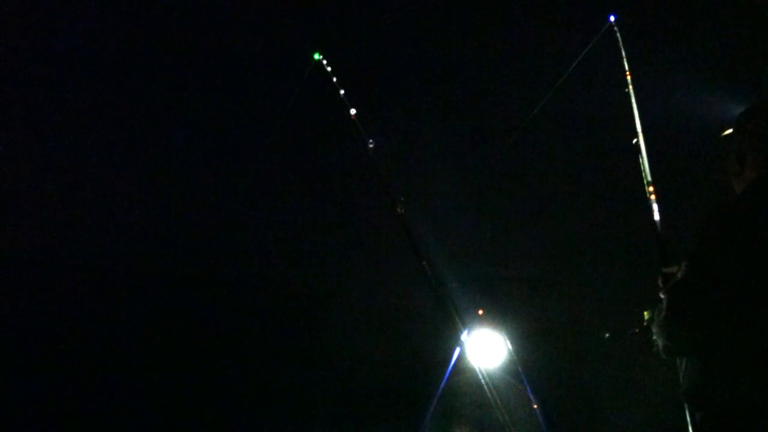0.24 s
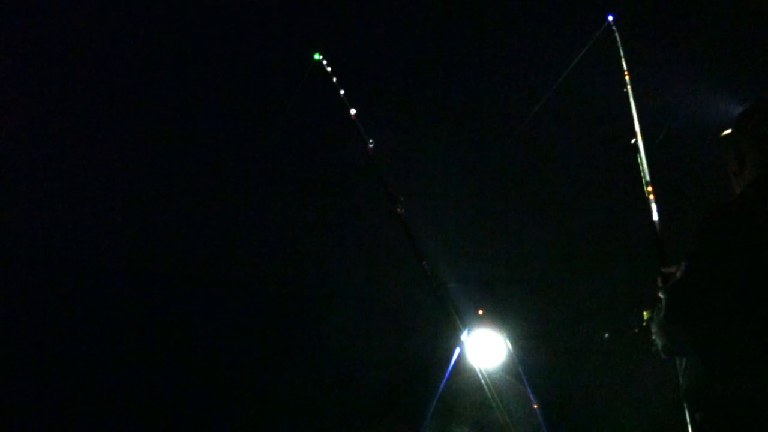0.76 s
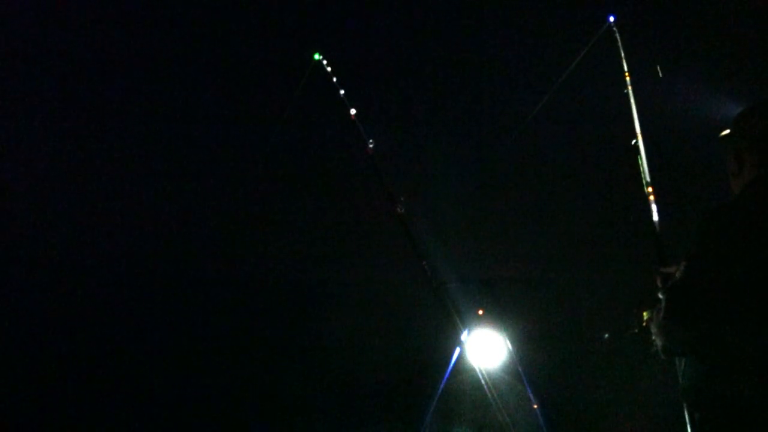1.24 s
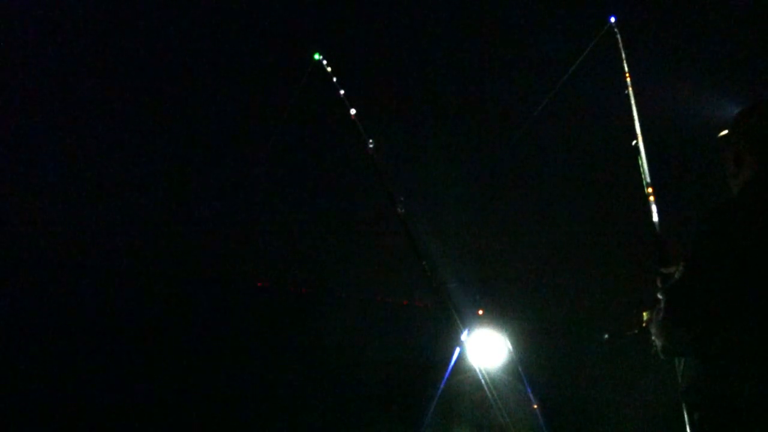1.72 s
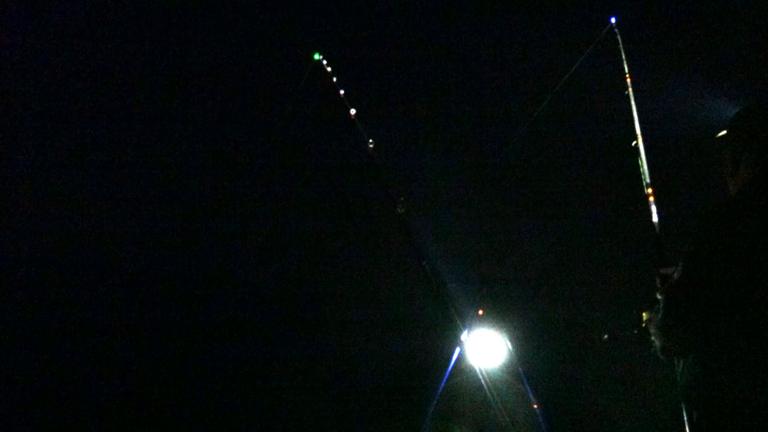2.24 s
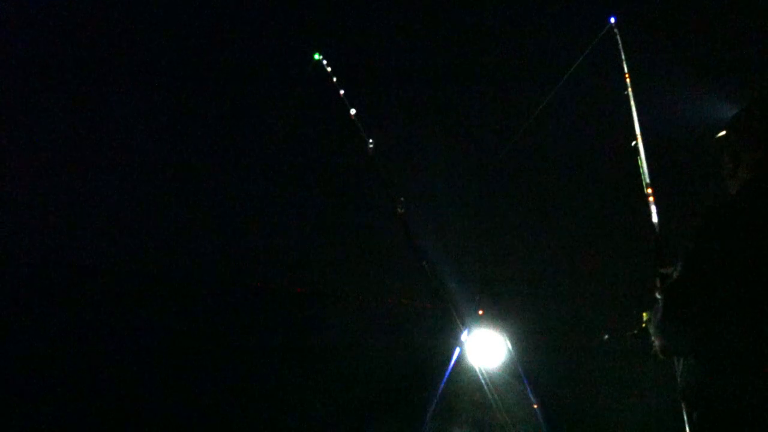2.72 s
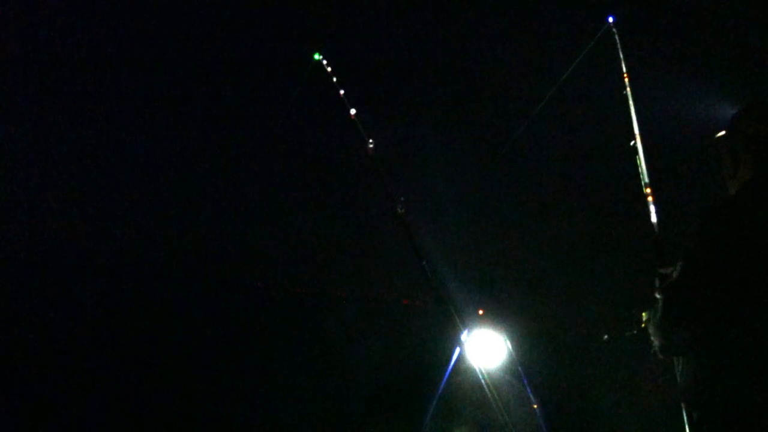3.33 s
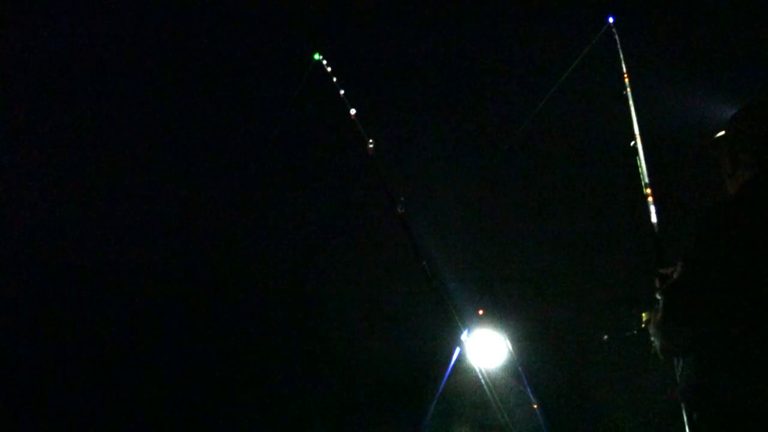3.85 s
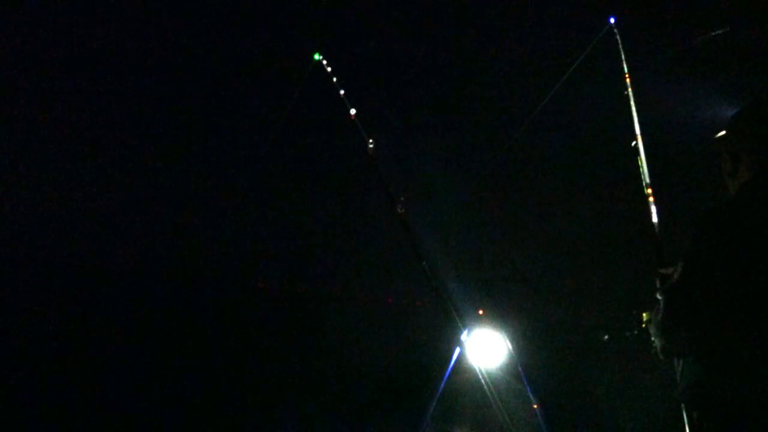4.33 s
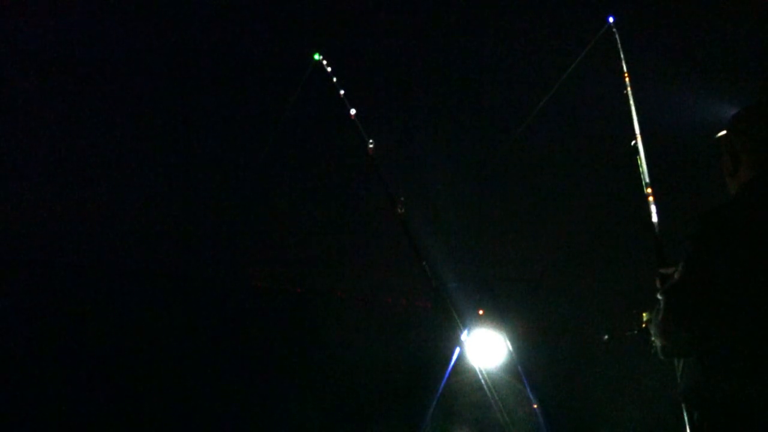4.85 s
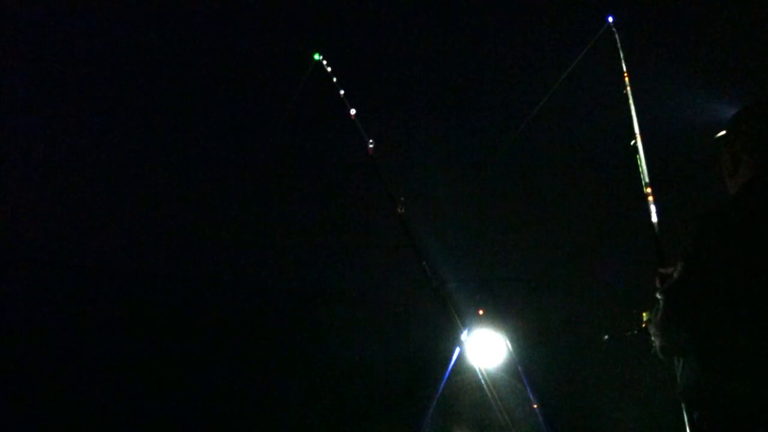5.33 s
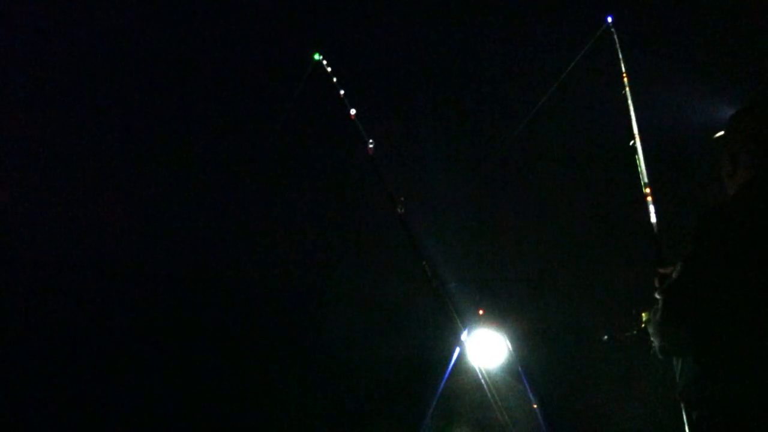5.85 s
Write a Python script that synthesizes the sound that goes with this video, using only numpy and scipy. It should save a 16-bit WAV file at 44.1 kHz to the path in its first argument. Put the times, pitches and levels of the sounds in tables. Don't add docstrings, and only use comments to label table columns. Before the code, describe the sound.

A wave foams up a pebble beach and drains away, stones rattling in the backwash, before a second wave plunges with a thump and spray.

```python
import sys
import numpy as np
from scipy import signal
from scipy.fft import rfft, irfft, next_fast_len
from scipy.io import wavfile
from scipy.ndimage import uniform_filter1d, map_coordinates

SR = 44100
rng = np.random.default_rng(int(sys.argv[2]) if len(sys.argv) > 2 else 0)


def volts_from_decibels(level):
    exponent = np.asarray(level, float) / 20
    return 10 ** exponent


def file_out(sig):
    cols = np.atleast_2d(sig).T
    lim = np.clip(cols, -1, 1)
    pcm = np.round(lim * 32767).astype(np.int16)
    wavfile.write(sys.argv[1], SR, pcm)


N = 268111

# pitch_hz, level_db
INPUT_HISS = [(10, 24), (43, 19), (90, 14), (170, 9), (350, 5), (700, 3), (3000, 1), (9000, 0), (13800, -1),
              (14100, 1), (14400, -1), (15100, -2), (15250, -8), (15600, -7)]
# start_s, level_db
BUZZ_LEVEL = [
    (0, -87),
    (2.2, -87),
    (2.7, -98),
    (3.6, -98),
    (4.1, -88),
    (4.8, -88),
    (5.05, -98),
    (5.3, -88),
    (6.08, -88),
]
# pitch_hz, level_db
MIC_NOISE = [(10, -1), (30, -3), (60, -6), (150, -22), (400, -30), (6000, -28), (13700, -30), (14100, -27),
             (14500, -31), (15500, -41)]

# start_s, level_db, big_bubbles (share 0-1)
FOAM_FLOW = [(0, -33, 0.21), (.18, -32, 0.17), (.41, -31, 0.06), (.62, -31, .04), (.87, -32.5, 0),
             (1.3, -38.5, 0.03), (1.63, -43, 0.16), (1.95, -47.5, 0.26), (2.4, -53, 0.13),
             (2.66, -57.5, 0.06), (2.88, -53, 0.12), (3.18, -52.5, 0.38), (3.4, -49.5, 0.22),
             (4.08, -47.5, 0.64), (4.23, -39, 0.98), (4.4, -30.5, 0.65), (4.56, -31, 0.94),
             (4.72, -33, 0.69), (4.98, -39.5, 0.58), (5.55, -48, 0.45), (6.08, -55, 0.48)]
# start_s, flow_db, extra_spray_db, rolling_stones (share 0-1)
WATER_FLOW = [(0, -41, 0, 0.24), (.41, -36, -0.5, 0.21), (.9, -36, 0, 0.18), (1.45, -42, 3.5, 0.25),
              (2.1, -50, -1, 0.08), (2.68, -55.5, -0.5, 0.17), (3.05, -52.5, 5, .33),
              (3.19, -55, 2.5, 0.31), (3.3, -50.5, 2.5, 0.33), (4.0, -51, 1.5, 0.23),
              (4.17, -52, 5.5, 0.12), (4.2, -46, 10, 0.28), (4.24, -44.5, 9, 0.2), (4.28, -39.5, 11, 0.15),
              (4.34, -38, 9.5, 0.2), (4.44, -41.5, 10.5, 0.08), (4.6, -40.5, 7.5, 0.12),
              (4.98, -53.5, 4.5, 0.1), (5.5, -56, 0.5, 0.12), (5.7, -64.5, -1, 0.15), (6.08, -67, -3, 0.17)]
# start_s, peak_db, fade_s (to 1/e)
WATER_SLAPS = [(.03, -51.5, 0.15), (1.2, -59, 0.092), (1.44, -52, 0.089), (1.58, -55, 0.1),
               (1.71, -55, 0.042), (2.2, -61, 0.085), (2.76, -63, 0.95), (3.13, -48, 0.027),
               (3.3, -77, 0.33), (3.55, -61.5, 0.54), (3.8, -58.5, 0.3), (4.22, -42.5, 0.12),
               (4.275, -40, 0.069), (4.48, -43, 0.2), (4.78, -49.5, 0.25), (4.95, -57, 0.5),
               (5.2, -58, 0.43), (5.55, -58, 0.12)]
# start_s, peak_db, fade_s (to 1/e)
FOAM_BURSTS = [(0.062, -20, 0.03), (0.19, -37, 0.028), (0.256, -18, 0.048), (0.308, -18, 0.045),
               (0.366, -13, 0.024), (0.439, -30, 0.03), (0.485, -11.5, 0.015), (0.529, -18.5, 0.058),
               (0.555, -18, 0.035), (0.625, -17, 0.03), (0.685, -32, 0.027), (0.728, -17, 0.03),
               (0.762, -26, 0.03), (0.85, -15, 0.023), (0.916, -20, 0.03), (1.019, -30, 0.03),
               (1.139, -21.5, 0.03), (1.539, -30, 0.03), (1.749, -31, 0.03), (1.956, -36, 0.025),
               (1.997, -51, 0.026), (2.05, -48, 0.03), (2.114, -41, 0.03), (2.239, -32, 0.021),
               (2.289, -36, 0.03), (2.349, -46, 0.03), (2.484, -36, 0.03), (2.545, -35.5, 0.026),
               (2.688, -38, 0.024), (2.791, -51, 0.03), (2.854, -40, 0.03), (2.978, -34, 0.022),
               (3.044, -43, 0.03), (3.15, -40, 0.03), (3.215, -36, 0.036), (3.255, -35, 0.042),
               (3.359, -50, 0.03), (3.599, -37, 0.03), (3.814, -38, 0.03), (3.889, -41, 0.03),
               (3.939, -41, 0.023), (3.999, -35, 0.03), (4.057, -32, 0.053), (4.114, -27.5, 0.03),
               (4.191, -24, 0.026), (4.227, -20.5, 0.025), (4.261, -33, 0.026), (4.304, -17, 0.03),
               (4.379, -16, 0.039), (4.405, -14.5, 0.036), (4.443, -29, 0.027), (4.506, -18, 0.042),
               (4.539, -14, 0.03), (4.599, -17, 0.074), (4.701, -24, 0.033), (4.744, -21, 0.021),
               (4.836, -39, 0.03), (4.979, -44, 0.03), (5.063, -28, 0.03), (5.159, -28, 0.023)]
# start_s, fine_bubbles (share 0-1)
FOAM_THINNING = [(0, 0), (.3, 0.44), (.8, 0.15), (1.3, 1), (1.9, 0.2), (2.5, 0.76), (2.9, 0.1), (4.0, 0.03),
                 (4.4, 0.3), (4.7, 0), (6.08, 0.15)]

# pitch_hz, level_db
THUMP_SPECTRUM = [(60, -60), (100, -33), (150, -7), (250, 5), (330, 4.5), (500, -6.5), (900, -61)]
BOOM_SPECTRUM = [(30, -50), (50, -32), (70, -17), (100, -3.5), (200, 2), (320, -2.5), (600, -68)]
SMALL_FOAM_SPECTRUM = [(150, -35), (300, -23.5), (590, -1), (920, 2), (1150, 3), (1400, -3), (1700, -11),
                       (2500, -14), (4000, -78)]
BIG_FOAM_SPECTRUM = [(120, -71), (250, -13), (400, -4), (620, -2), (1130, -7), (1500, -15.5), (2200, -20.5),
                     (4000, -69)]
FINE_FOAM_SPECTRUM = [(250, -48), (600, -15), (950, -4), (1230, -1), (1450, -5.5), (1750, -15.5),
                      (2500, -19), (4000, -70)]
WASH_SPECTRUM = [(700, -52), (1300, 5.5), (1700, 3.5), (2100, 0.5), (2800, -4.5), (3500, -18),
                 (4500, -14.5), (6000, -21.5), (9000, -81)]
FIZZ_SPECTRUM = [(900, -57), (1500, -0.5), (2000, -7.5), (2600, 0), (3500, -2), (4300, -10), (4800, -13),
                 (6000, -37), (9000, -75)]
CLATTER_SPECTRUM = [(800, -35), (1500, -0.5), (2200, 10.5), (2800, -5), (3500, 0.5), (4200, -10),
                    (4800, -9), (6000, -41), (9000, -72)]
SPRAY_SPECTRUM = [(2500, -36), (4000, -4.5), (5000, -0.5), (6200, -2), (7300, -11.5), (9500, -20.5),
                  (12000, -27.5), (15500, -38)]
MIST_SPECTRUM = [(2500, -18), (4000, -1), (5000, -4), (6200, -8), (7900, -8.5), (9500, -15), (11800, -22),
                 (15500, -36)]
TINKLE_SPECTRUM = [(2500, -14), (4200, -2), (4800, -14), (5500, -3), (6300, -11), (7500, -8), (9500, -21.5),
                   (12000, -30), (15500, -46)]

# start_s, peak_db
GRIT_SNAPS = [(0.016, -47), (0.0323, -46), (0.078, -51), (0.206, -48), (0.1052, -53), (0.1376, -47),
              (0.1585, -48), (0.1955, -47), (0.2718, -55), (0.2887, -49), (0.3641, -54), (0.4793, -45),
              (0.5162, -54), (0.6484, -50), (0.6669, -52), (0.9288, -48), (1.0575, -55), (1.1692, -53),
              (1.2461, -52), (1.486, -52), (1.5554, -58), (1.7664, -58), (1.8766, -53), (1.9155, -52),
              (1.945, -45), (2.0787, -56), (2.1161, -47), (2.1954, -55), (2.3291, -57), (2.3635, -57),
              (2.4309, -64), (2.5296, -61), (2.7467, -57), (2.9013, -57), (2.9472, -61), (2.9776, -58),
              (3.0939, -54), (3.1797, -62), (3.258, -59), (3.272, -56), (3.3114, -50), (3.3528, -55),
              (3.4481, -60), (3.4655, -47), (3.5209, -57), (3.6511, -58), (3.7718, -59), (3.9634, -53),
              (4.1989, -54), (4.295, -46), (4.756, -45), (4.863, -47), (5.2844, -50), (5.5119, -57),
              (5.8591, -58), (5.915, -54), (5.9843, -70), (6.0137, -55)]
# start_s, peak_db, pitch_hz
STONE_TICKS = [(0.1584, -50, 4320), (0.1955, -49, 5650), (0.3676, -56, 4390), (0.5212, -45, 4600),
               (0.5417, -41, 4400), (0.6355, -48, 4300), (0.8554, -46, 4460), (1.0584, -45, 4550),
               (1.3374, -40, 4960), (1.4197, -49, 4380), (1.4474, -39, 4430), (1.488, -48, 4300),
               (1.6003, -41, 5080), (1.6164, -42, 4810), (1.7614, -41, 4600), (1.7828, -43, 5400),
               (1.9924, -45, 5570), (2.0797, -59, 4650), (2.1334, -46, 4370), (2.2174, -43, 4730),
               (2.5296, -44, 5450), (2.7466, -44, 4300), (2.9272, -55, 5050), (4.2244, -43, 4300),
               (4.2433, -42, 5080), (4.2744, -38, 4500), (5.1682, -50, 4580), (5.8591, -54, 4370),
               (5.9274, -52, 5430), (5.9843, -59, 5330)]
# start_s, peak_db, pitch_hz, chip_db (bright chip over the ring)
PEBBLE_KNOCKS = [(1.9437, -38, 2870, -8), (2.162, -40, 2800, -6), (2.465, -43, 2700, -6),
                 (2.695, -43, 4400, -9), (2.7138, -44, 3260, -12), (2.751, -46, 2600, -18),
                 (2.798, -46, 3740, -7), (2.829, -44, 3400, -12), (2.8586, -42, 2570, -18),
                 (2.966, -45, 3240, -15), (2.9901, -40, 3320, -22), (3.0242, -37.5, 2720, -24),
                 (3.0765, -38.5, 2850, -23), (3.0939, -40, 3050, -9), (3.1167, -38.5, 3600, -10),
                 (3.137, -43, 3780, -18), (3.2594, -41, 3550, -17), (3.275, -33, 3300, -21),
                 (3.311, -41, 2830, -27), (3.3916, -40, 3100, -22), (3.462, -41, 3320, -18),
                 (3.5036, -41, 3440, -19), (3.5283, -38, 3450, -25), (3.6643, -39, 3400, -19),
                 (3.7505, -38.5, 2390, -24), (3.821, -40, 3400, -16), (3.8516, -41, 3180, -16),
                 (3.925, -40, 3870, -20), (4.011, -39, 3530, -19), (4.1954, -34, 4290, -11)]
# start_s, peak_db, pitch_hz
STONE_PATTER = [(2.0944, -38, 3000), (2.2907, -36, 4200), (2.4474, -52, 5250), (2.4854, -49, 3670),
                (2.609, -43, 4500), (2.66, -46, 4600), (2.669, -46, 4000), (2.688, -40, 2300),
                (2.995, -38, 3300), (3.012, -41, 2600), (3.124, -36, 2600), (3.19, -40, 3700),
                (3.234, -40, 2900), (3.887, -39, 2800), (2.5004, -52, 3420), (2.5835, -51, 3650),
                (2.7202, -42, 3420), (2.7701, -35, 3130), (2.8215, -42, 3800), (2.8824, -40, 3920),
                (2.9464, -47, 3000), (2.9582, -36, 3850), (2.9774, -42, 3290), (3.0454, -41, 3790),
                (3.0604, -38, 3910), (3.1424, -37, 3800), (3.1852, -36, 3450), (3.299, -45, 3440),
                (3.3473, -44, 3360), (3.3717, -34, 3530), (3.4004, -40, 3700), (3.556, -43, 3340),
                (3.5824, -36, 3030), (3.613, -41, 3380), (3.6534, -40, 3360), (3.7244, -48, 3760),
                (3.7693, -35, 3770), (3.8034, -38, 3340), (3.8884, -43, 3180), (3.9574, -49, 3480),
                (4.0404, -48, 3820), (4.0954, -46, 3090), (4.1144, -39, 3910)]
# start_s, peak_db, pitch_hz
FLUNG_STONES = [(4.1774, -34, 3660), (4.2264, -31, 3880), (4.2434, -34, 2730), (4.2737, -29, 2730),
                (4.2944, -28, 3040), (4.3804, -33, 2690), (4.5784, -36, 3390), (4.6254, -32, 2580),
                (4.7294, -36, 2820), (4.7554, -31, 2720), (4.8624, -34, 3680), (4.8903, -33, 3610),
                (4.9174, -43, 2790), (4.9494, -41, 2600), (5.0644, -44, 2680)]
# start_s, peak_db, pitch_hz
AIR_GULPS = [(1.2, -55.5, 189), (1.447, -52.5, 203), (1.48, -53.5, 157), (1.611, -45, 213),
             (1.46, -49, 440), (1.54, -56, 383), (1.66, -63, 332), (1.721, -65, 156), (1.8, -47, 323),
             (1.92, -58, 400), (2.02, -61, 355), (2.45, -63, 238), (2.78, -62, 332), (3.78, -58, 184),
             (2.215, -70, 112), (3.66, -64, 94), (3.687, -38, 945), (4.9, -31, 950), (4.3, -44, 216),
             (4.319, -47, 85.5), (4.392, -50.5, 67.6), (4.469, -59, 59.5)]
# start_s, peak_db, pitch_hz
BUBBLE_GURGLES = [(1.475, -33, 1250), (1.539, -30.5, 730), (1.561, -23, 1050), (1.657, -32, 1180),
                  (1.798, -33, 1180), (1.869, -31, 1170), (2.113, -35, 656), (2.719, -37, 760),
                  (2.929, -40, 640), (3.043, -32, 1040), (3.229, -40, 1120), (3.329, -36, 1390),
                  (3.419, -41, 1100), (3.528, -44, 1310), (3.599, -38, 1160), (3.749, -36, 1540),
                  (3.811, -36, 770), (3.898, -42, 446), (3.949, -30, 690), (3.979, -39, 840),
                  (4.019, -32, 600), (4.057, -29, 555), (4.129, -36, 714)]


def unit(x):
    return x / np.sqrt(np.mean(x ** 2) + 1e-20)


def curves(rows):
    s, *columns = np.transpose(rows)
    t = np.arange(N) / SR
    return [np.interp(t, s, column) for column in columns]


def wobble(rate):
    points = rng.standard_normal(N // 500)
    return map_coordinates(points, [np.arange(N) * np.clip(rate, 0, 80) / SR])


def coloured(x, spectrum):
    size = next_fast_len(N + 8192)
    hz, db = np.transpose(spectrum)
    log_hz = np.log(np.fft.rfftfreq(size, 1 / SR) + 1)
    gain = volts_from_decibels(np.interp(log_hz, np.log(hz + 1), db, left=-120))
    return unit(irfft(rfft(x, size) * gain, size)[:N])


def patchy(patchy_db):
    z = signal.stft(rng.standard_normal(N), nperseg=512)[2]
    field = uniform_filter1d(rng.standard_normal(z.shape), 5, 0)
    field = uniform_filter1d(field, 8, 1)
    return unit(signal.istft(z * volts_from_decibels(patchy_db * unit(field)), nperseg=512)[1][:N])


def pings(s, hz, gain, cycles, rise, size, sharp=2):
    k = np.arange(size)
    age = hz[:, None] * k / SR
    tone = np.sin(2 * np.pi * age * (1 + rise * age / cycles))
    wave = tone * np.exp(-age / cycles) * (1 - np.exp(-sharp * age))
    at = (s * SR).astype(int)[:, None] + k
    return np.bincount(at.ravel(), (gain[:, None] * wave).ravel(), N + size)[:N]


def swarm(count, hz, spread, range_db, cycles, rise, size):
    u, g = rng.random((count, 2)), rng.standard_normal(count)
    pitch = np.clip(hz * np.exp(spread * g), 50, 15000)
    rare = -np.log(u[:, 1] + .015)
    return unit(pings(u[:, 0] * N / SR, pitch, volts_from_decibels(range_db * rare), cycles, rise, size))


def blend(a, b, share):
    share = np.clip(share, 0, 1)
    return np.sqrt(1 - share) * a + np.sqrt(share) * b


def outbursts(rows, rise_s):
    t = np.arange(0, N + 64, 64) / SR
    s, db, fade_s = np.transpose(rows)[..., None]
    age = np.clip(t - s, 0, None)
    power = np.sum(volts_from_decibels(2 * db) * (1 - np.exp(-age / rise_s)) * np.exp(-2 * age / fade_s), axis=0)
    return np.interp(np.arange(N) / SR, t, power)


def circuit():
    t = np.arange(N) / SR
    buzz_hz, hiss_db = 470.6, -77.6
    buzz = unit(sum(volts_from_decibels(-.6 * k) * np.cos(2 * np.pi * k * buzz_hz * t) for k in range(1, 15)))
    hiss = coloured(rng.standard_normal(N), INPUT_HISS)
    return volts_from_decibels(hiss_db) * hiss + volts_from_decibels(curves(BUZZ_LEVEL)[0]) * buzz


def microphone_noise():
    return volts_from_decibels(-77) * coloured(rng.standard_normal(N), MIC_NOISE)


def breaking_foam():
    foam_db, big = curves(FOAM_FLOW)
    return foam_db, np.clip(big, .01, 1)


def far_surf():
    rolling = curves(WATER_FLOW)[2]
    return volts_from_decibels(-84 + 51.5 * rolling + 1.4 * wobble(3.1)) * coloured(patchy(1.5), BOOM_SPECTRUM)


def trapped_air(lap):
    foam_db, big = breaking_foam()
    heave_db = -66 + 0.98 * (foam_db + 10 * np.log10(big) + 51)
    thump_db = 10 * np.log10(volts_from_decibels(2 * heave_db) + outbursts(WATER_SLAPS, rise_s=0.014))
    deep = 0.013 + 0.57 * big
    low = blend(coloured(patchy(1.7), THUMP_SPECTRUM), coloured(patchy(0.37), BOOM_SPECTRUM), deep)
    return volts_from_decibels(thump_db + .5 * lap + 0.44 * wobble(1.5)) * low


def foam(spectrum, bubble_hz):
    bubbles = swarm(count=4000, hz=bubble_hz, spread=0.3994, range_db=3.0, cycles=4.97, rise=0.044, size=900)
    return blend(coloured(patchy(1.0), spectrum), coloured(bubbles, spectrum), 0.2)


def foam_roar(lap):
    foam_db, big = breaking_foam()
    fine = curves(FOAM_THINNING)[0]
    small = blend(foam(SMALL_FOAM_SPECTRUM, 1123.0), coloured(patchy(1.3), FINE_FOAM_SPECTRUM), fine)
    steady_power = volts_from_decibels(2 * (foam_db - 0.5 + 0.067 * lap))
    burst_power = volts_from_decibels(2 * -14) * outbursts(FOAM_BURSTS, rise_s=0.0021)
    return np.sqrt(steady_power + burst_power) * blend(small, foam(BIG_FOAM_SPECTRUM, 597.0), big)


def rolling_stones():
    stones = swarm(count=12000, hz=4500, spread=0.539, range_db=3.0, cycles=1.3, rise=0, size=90)
    return volts_from_decibels(1.77 * wobble(45)) * stones


def wash(lap, stones):
    wash_db, _, rolling = curves(WATER_FLOW)
    big = breaking_foam()[1]
    fizz = 0.013 + 0.61 * big + 0.47 * rolling
    flow = blend(coloured(patchy(0.53), WASH_SPECTRUM), coloured(patchy(0.96), FIZZ_SPECTRUM), fizz)
    return volts_from_decibels(wash_db + 0.16 * lap) * blend(flow, coloured(stones, CLATTER_SPECTRUM), 0.71 * rolling)


def spray(lap, stones):
    wash_db, thrown_db, rolling = curves(WATER_FLOW)
    big = breaking_foam()[1]
    spray_db = -61.5 + 0.46 * (wash_db + 51.0) + thrown_db
    hiss = blend(coloured(patchy(0.77), SPRAY_SPECTRUM), coloured(patchy(0.97), MIST_SPECTRUM), big)
    mix = blend(hiss, coloured(stones, TINKLE_SPECTRUM), 2.54 * rolling)
    return volts_from_decibels(spray_db + 0.14 * lap + 0.14 * wobble(48)) * mix


def surf():
    lap = wobble(22.06)
    stones = rolling_stones()
    return far_surf() + trapped_air(lap) + foam_roar(lap) + wash(lap, stones) + spray(lap, stones)


def grit():
    s, db = np.transpose(GRIT_SNAPS)
    g = rng.standard_normal((len(s), 2))
    hz = 7240 * np.exp(0.16 * g)
    main = pings(s, hz[:, 0], volts_from_decibels(db + 7.5), cycles=2.5, rise=0, size=90, sharp=.8)
    upper = pings(s, 1.3 * hz[:, 1], volts_from_decibels(db - 5), cycles=2.5, rise=0, size=90, sharp=.8)
    return main + upper


def small_stones():
    patter = np.add(STONE_PATTER, [0, -6.5, 0])
    flung = np.add(FLUNG_STONES, [0, -8, 0])
    s, db, hz = np.vstack([STONE_TICKS, patter, flung]).T
    tick = pings(s, hz, volts_from_decibels(db + 9.5), cycles=2.0, rise=0, size=120)
    overtone = pings(s, 1.4 * hz, volts_from_decibels(db - 6), cycles=1.1, rise=0, size=60)
    return tick + overtone


def rollers():
    u, g = rng.random((600, 2)), rng.standard_normal((600, 3))
    rolling = curves(WATER_FLOW)[2][(u[:, 0] * N).astype(int)]
    rolling = np.clip(rolling / .4, .01, 1)
    db = -54 + 3 * np.clip(g[:, 0], -3, 1.5) + 20 * np.log10(rolling)
    hz = 3500 * np.exp(0.12 * g[:, 1])
    chip_db = 4 * np.clip(g[:, 2], -3, .5) - 9
    happens = u[:, 1] < rolling ** 2.5
    return np.array([u[:, 0] * N / SR, db, hz, chip_db])[:, happens]


def skipping(s, db, hz, chip_db):
    u, g = rng.random((len(s), 2)).T, rng.standard_normal((len(s), 2)).T
    later_s = s + 0.00165 + .006 * u
    softer_db = db - 10 + 0 * u
    after = [later_s, softer_db, hz * np.exp(.22 * g), chip_db + 0 * u]
    return [np.append(a, np.ravel(b)) for a, b in zip((s, db, hz, chip_db), after)]


def pebbles():
    s, db, hz, chip_db = skipping(*np.hstack([np.transpose(PEBBLE_KNOCKS), rollers()]))
    g = np.clip(rng.standard_normal((len(s), 2)), -2, 1)
    click = pings(s, hz, volts_from_decibels(db + 7.0), cycles=2.23, rise=0, size=200)
    knock = pings(s, 0.51 * hz, volts_from_decibels(db + 11.0), cycles=0.87, rise=0, size=200)
    crack = pings(s, np.full(len(s), 7600.0), volts_from_decibels(db - 30 + 4.1 * g[:, 0]), cycles=1.2, rise=0, size=100)
    chip = pings(s, 5400 * np.exp(0.12 * g[:, 1]), volts_from_decibels(db + 8.5 + chip_db), cycles=3.4, rise=0, size=120)
    return click + knock + crack + chip


def scattered(direct):
    t = np.arange(900) / SR
    scatter_db, fade_60db_s, direct_db, soft_hz = -21, .016, -2.5, 10000
    place = np.pi * wobble(30)
    tails = rng.standard_normal((2, 900)) * volts_from_decibels(scatter_db - 60 * t / fade_60db_s)
    feeds = direct * np.array([np.cos(place), np.sin(place)])
    spread = signal.fftconvolve(feeds, tails, axes=1)[:, :N].sum(0)
    soften = signal.butter(4, soft_hz, fs=SR, output="sos")
    return signal.sosfilt(soften, volts_from_decibels(direct_db) * direct + spread)


def gulps():
    s, db, hz = np.vstack([AIR_GULPS, np.add(BUBBLE_GURGLES, [0, -8.5, 0])]).T
    note = pings(s, hz, volts_from_decibels(db + 7), cycles=2.8, rise=0.02, size=6000, sharp=1.0)
    return note * volts_from_decibels(2.5 * wobble(70))


def scene():
    clicks = scattered(grit() + small_stones() + pebbles())
    sea = volts_from_decibels(5.5) * (surf() + clicks + gulps())
    return np.array([sea, np.zeros(N)])


def band_limit(x):
    return signal.sosfilt(signal.butter(12, 15720, fs=SR, output="sos"), x)


def record(dry):
    noise = np.array([microphone_noise() + circuit(), circuit()])
    return band_limit(dry + noise)


dry = scene()
out = record(dry)
file_out(out)
```